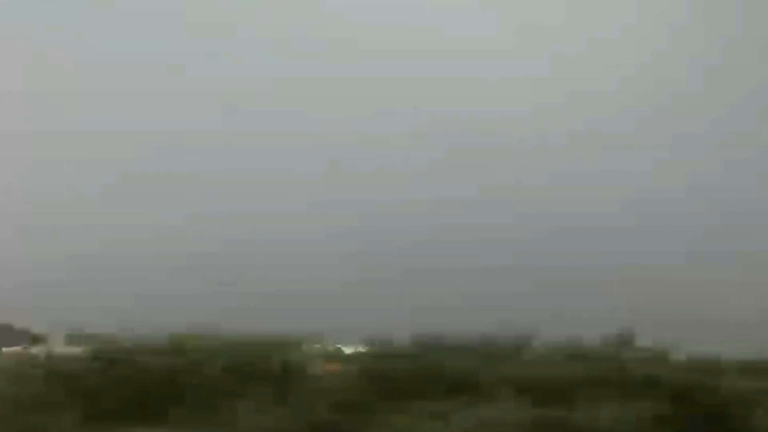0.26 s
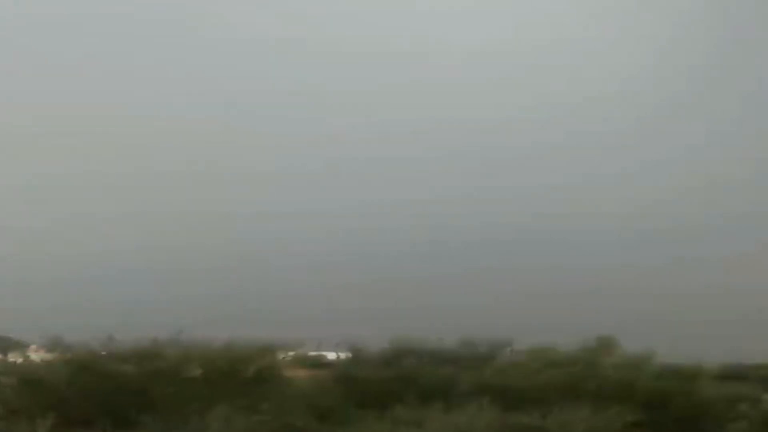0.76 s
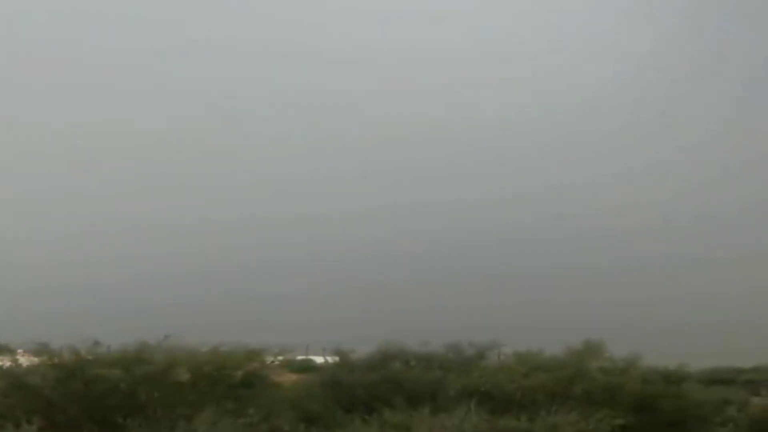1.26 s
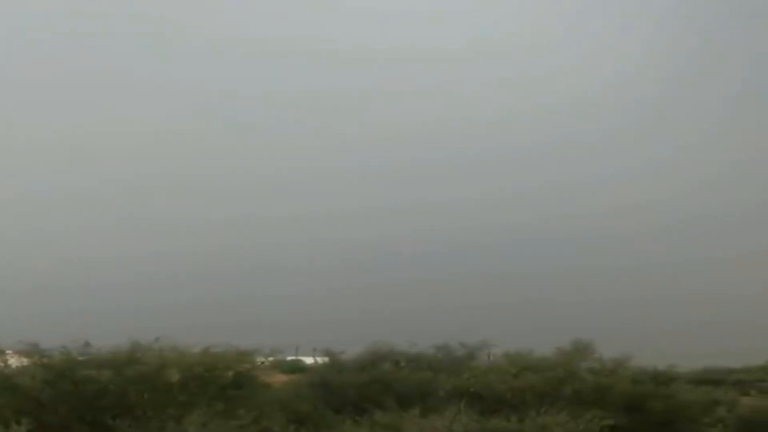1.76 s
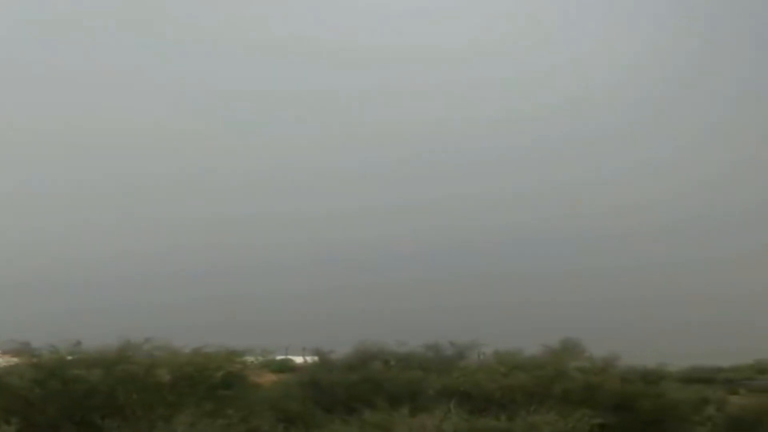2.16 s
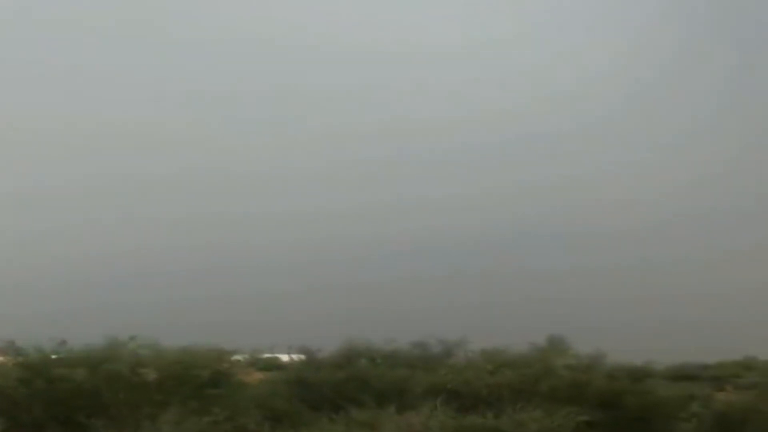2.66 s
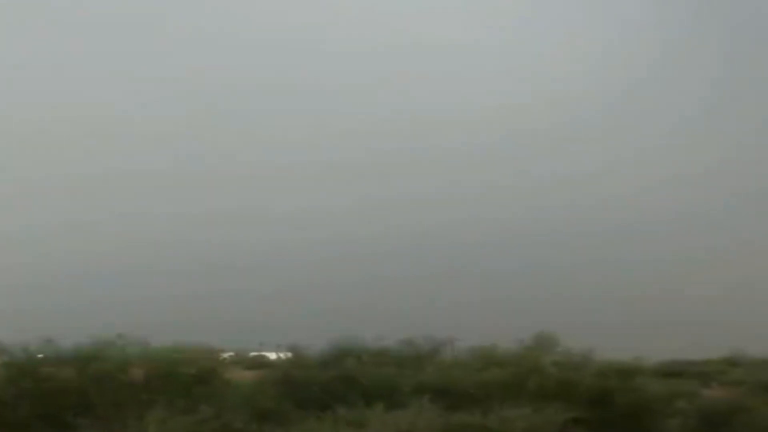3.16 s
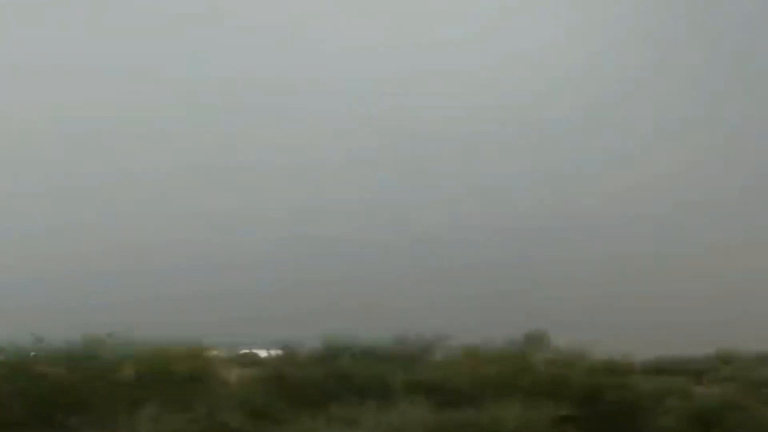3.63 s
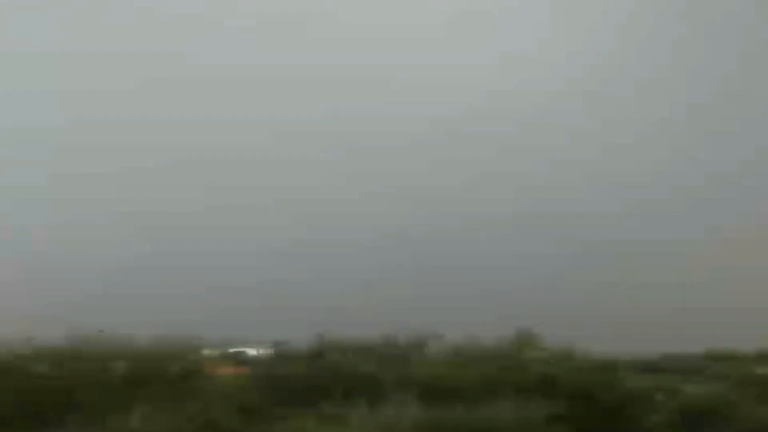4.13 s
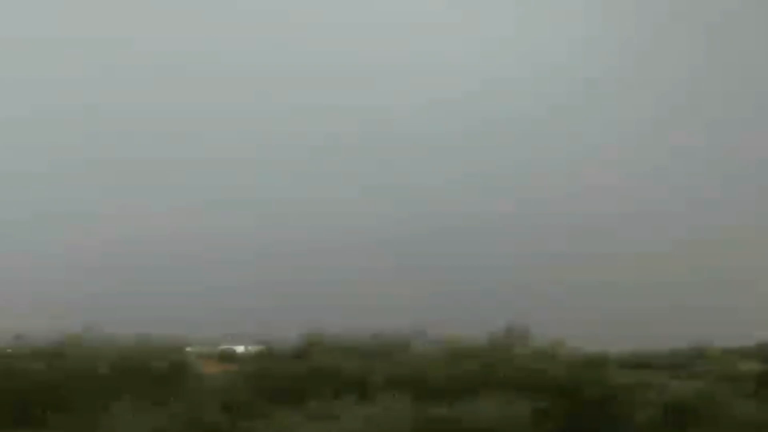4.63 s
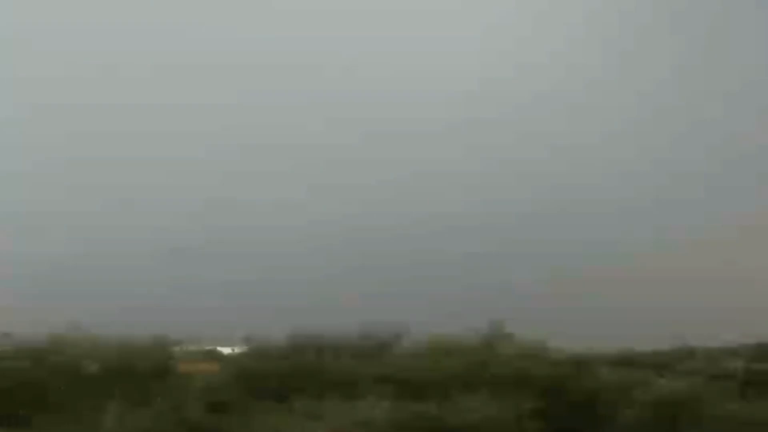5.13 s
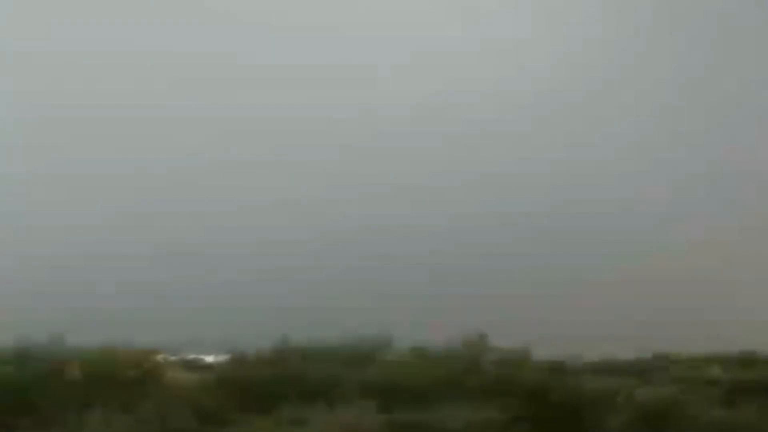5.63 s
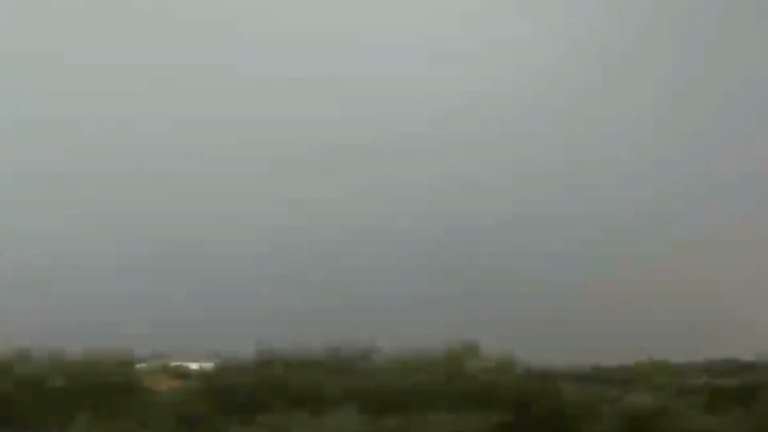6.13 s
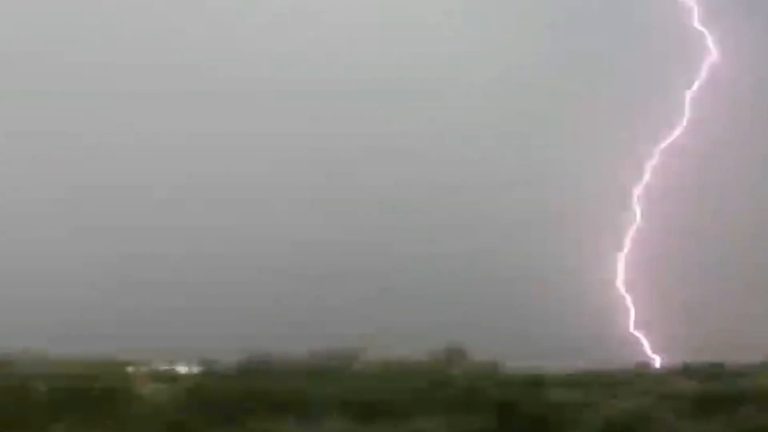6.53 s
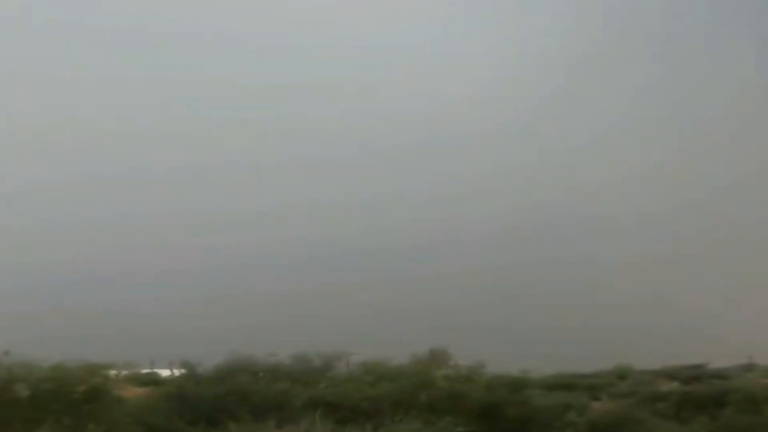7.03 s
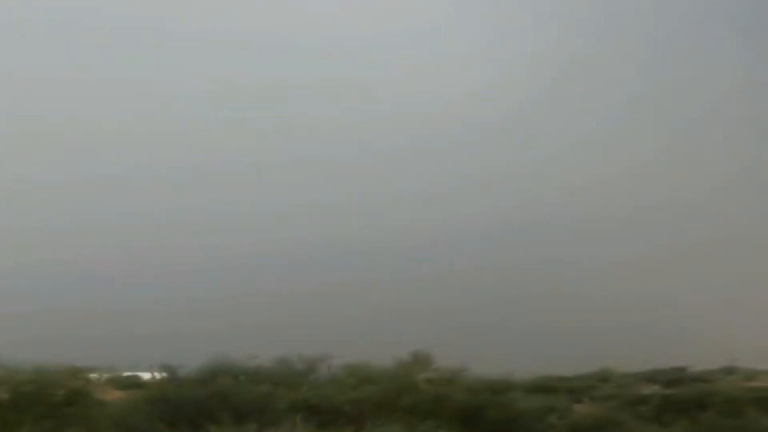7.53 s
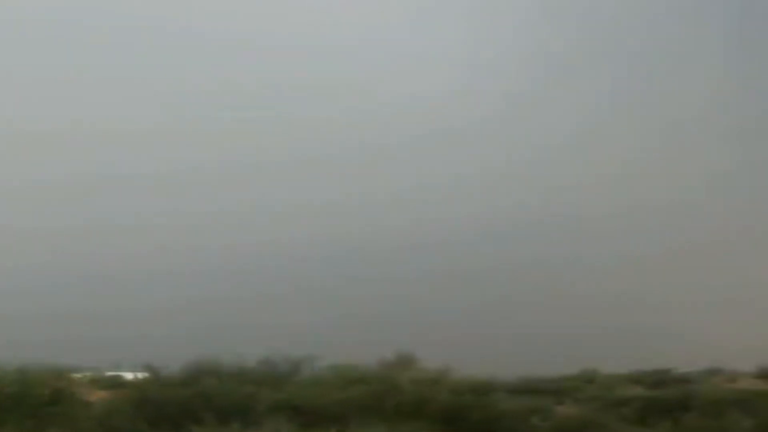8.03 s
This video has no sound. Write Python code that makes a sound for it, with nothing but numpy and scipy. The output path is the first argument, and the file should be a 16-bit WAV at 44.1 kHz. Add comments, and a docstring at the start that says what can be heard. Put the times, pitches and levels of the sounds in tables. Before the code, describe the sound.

Light rain falls outdoors, a faint steady hiss with sharp drips and spatters landing near a small microphone. Much louder, thunder is already rumbling across the open land. It comes in uneven waves of dull booms, peaks in one heavy peal, keeps growling and swells again before it starts to die down, while the drops go on ticking.

```python
"""Thunder rolls in long swells over open country while rain falls, heard by one small microphone.
The roll is a dense stream of shock waves from a long lightning channel: peals ride on a rumble,
and single booms stand out. Far rain merges into a hiss; near drops tick, splash and spatter,
and a few trap bubbles that plink. Midway a faint buzz passes in the distance, with one thin squeak."""
import sys
import numpy as np
from scipy import signal
from scipy.fft import rfft, irfft
from scipy.io import wavfile
from scipy.ndimage import uniform_filter1d

SR = 44100
rng = np.random.default_rng(int(sys.argv[2]) if len(sys.argv) > 2 else 0)


def unload_audio(sound):
    """Save the sound as a 16-bit wav file, at the path given as the first command line argument."""
    columns = np.transpose(np.atleast_2d(sound))
    # keep every value between -1 and 1, then stretch to whole-number steps
    steps = np.round(np.clip(columns, -1, 1) * 32767)
    wavfile.write(sys.argv[1], SR, steps.astype(np.int16))


N = 365588
T = np.arange(N) / SR
HZ = np.fft.rfftfreq(N, 1 / SR)


def gain_of(db):
    """Decibels to amplitude."""
    return 10 ** (np.asarray(db) / 20)


def unit_rms(x):
    """Scales to rms 1."""
    return x / np.sqrt(np.mean(x ** 2) + 1e-20)


def eq_curve(points, hz):
    """Joins EQ points by straight lines on a log-frequency axis."""
    f, db = np.transpose(points)
    return np.interp(np.log(hz + 1), np.log(f + 1), db)


def high_cut(edge_hz):
    """Gain of a steep low-pass over the spectrum."""
    return 1 / (1 + (HZ / edge_hz) ** 12)


def automation(rows):
    """Turns timed breakpoints into one curve per column."""
    times, *columns = np.transpose(rows)
    return [np.interp(T, times, column) for column in columns]


def wobble(shape, samples):
    """Smoothed noise of rms 1, for modulation."""
    return unit_rms(uniform_filter1d(rng.standard_normal(shape), size=samples, axis=0))


def add(mix, s, sound):
    """Mixes a sound in at s seconds."""
    part = mix[max(round(s * SR), 0):][:len(sound)]
    part += sound[:len(part)]


def clicks(per_s, spread_db):
    """Impulses at random times: many small, a few large."""
    size = gain_of(spread_db * np.minimum(rng.exponential(1, N), 4))
    return size * rng.choice([-1., 1.], N) * (rng.random(N) < per_s / SR)


def tick(centre_hz, octaves, size=512):
    """A sharp transient of energy 1 whose spectrum is one broad hump."""
    hz = np.fft.rfftfreq(size, 1 / SR) + 1
    log_gain = np.maximum(-3 * np.log(1 + (np.log2(hz / centre_hz) / octaves) ** 2 / 2), -9)
    mirrored = np.concatenate([log_gain, log_gain[-2:0:-1]])
    pulse = np.fft.ifft(np.exp(signal.hilbert(mirrored).conj())).real  # minimum phase: no pre-ring
    return pulse / np.linalg.norm(pulse)


def resonate(x, hz, width_hz):
    """A resonance of gain 1 that follows the curve hz."""
    carrier = np.exp(2j * np.pi * np.cumsum(hz) / SR)
    pole = np.exp(-np.pi * width_hz / SR)
    return 2 * (carrier * signal.lfilter([1 - pole], [1, -pole], x / carrier)).real


# Tone of thunder after its way through the air: f/Hz, relative level/dB
THUNDER_EQ = [(13, -52), (25, -26), (45, -6.5), (60, 2.5), (75, 4.5), (120, 1.5), (175, 0.5), (265, -5.5),
              (350, -9), (450, -14), (600, -22), (780, -28), (1100, -39.5), (1600, -53), (2600, -87.5)]

def shock_stream(per_s=2300, spread_db=1.5):
    """Shocks from all along the lightning channel overlap, dulled by the air."""
    return irfft(rfft(clicks(per_s, spread_db)) * gain_of(eq_curve(THUNDER_EQ, HZ)), N)


# Clearness of the air path: t/s, treble shelf gain/dB
AIR_SHELF = [(0, 6.5), (1.5, 7.5), (2.9, 4), (3.4, -3), (4.5, 3), (6.2, 1.5), (8.29, 1)]

def air_path(shocks, shelf_hz=666):
    """Clearer air lets more of the thunder's top through."""
    treble = irfft(rfft(shocks) * (1 - high_cut(shelf_hz)), N)
    return shocks + (gain_of(automation(AIR_SHELF)[0]) - 1) * treble


# A near bounce that shifts with the thunder's direction: t/s, delay/s, gain/factor
NEAR_BOUNCE = [(0, 0.0069, 0.37), (2.85, 0.0066, 0.27), (3.3, 0.00496, 0.17), (4.2, .0036, 0.066),
               (5.2, 0.0035, 0.15), (6.3, 0.00402, 0.28), (8.29, 0.00492, 0.19)]

def near_reflection(shocks):
    """The bounce cuts a moving comb into the sound."""
    delay_s, gain = automation(NEAR_BOUNCE)
    return shocks + gain * np.interp(T - delay_s, T, shocks)


# The bed under the peals: t/s, body level/dB, tearing top level/dB
RUMBLE_BED = [(0, -29, -37), (.7, -31, -41), (1.45, -34.5, -46.5), (2.05, -33.5, -45), (2.9, -32, -41.5),
              (3.6, -29.5, -39), (4.8, -27.5, -45), (5.6, -29.5, -43.5), (6.5, -30, -44.5),
              (7.7, -35, -52.5), (8.29, -36.5, -52)]

def rumble_power(deep_db=-9.5, growl_db=-3):
    """Power of the unbroken rumble in four bands: deep bass, body, growl, tearing top."""
    body, tear = automation(RUMBLE_BED)
    return gain_of([body + deep_db, body, body + growl_db, tear]) ** 2


# One peal for each stretch of the channel:
# t/s, length/s, body level/dB, deep bass re body/dB, growl re body/dB, core f/Hz
PEAL_CUES = [(0.017, 0.045, -27, -2, -1.5, 149), (0.212, .07, -33, -7, 2.5, 173),
             (0.42, 0.2, -28, -3.5, -3, 172), (0.884, .13, -34.5, -4, -7, 164),
             (2.131, 0.14, -23, -2.5, -5.5, 163), (2.325, 0.14, -27.5, -4, -6, 135),
             (2.804, 0.12, -31.5, -13, 0, 296), (3.068, 0.34, -23.5, -8, -4.5, 179),
             (3.4, 0.19, -17.5, -6, -7, 113), (3.621, 0.25, -26.5, -7.5, -3, 186),
             (3.936, 0.31, -24.5, -5, -5.5, 149), (4.263, 0.11, -28, 5, 2.5, 99),
             (4.377, 0.21, -23.5, -5, 1, 275), (4.932, 0.26, -31, -1, 6, 279),
             (5.687, 0.25, -30.5, -2, 3.5, 260), (6.028, 0.11, -27, 1, 1.5, 176),
             (6.121, 0.2, -22.5, -14.5, -0.5, 250), (6.507, .22, -30.5, -3.5, -2.5, 236),
             (6.884, 0.24, -31.5, -11, -8, 171), (7.133, 0.16, -36, -1.5, 3, 241)]
PEAL_ATTACK_S = 0.065

def peal_power(release_s=0.08, tear_db=-16.5):
    """Power of the peals in the same four bands: each swells, holds and dies away."""
    power = np.zeros((4, N))
    for s, length, db, deep, growl, _ in PEAL_CUES:
        attack = np.clip((T - s) / PEAL_ATTACK_S, 0, 1)
        release = np.exp(-np.maximum(T - s - length, 0) / release_s)
        bands = gain_of([db + deep, db, db + growl, db + growl + tear_db])
        power += np.outer(bands, attack * release) ** 2
    return power


def peal_core(shocks, boost=0.64, width_hz=50):
    """Each peal gathers its weight around one pitch, which glides on to that of the next."""
    pitches = [(s + PEAL_ATTACK_S + part * length, hz)
               for s, length, *_, hz in PEAL_CUES for part in (0, .5)]
    return shocks + boost * resonate(shocks, automation(pitches)[0], width_hz)


# Crossovers between deep bass, body, growl and tearing top: f/Hz
CROSSOVERS = [100, 220, 480]

def thunder_roll(steady_s=0.083):
    """The shock stream, levelled band by band, rides the swells of rumble and peals."""
    shocks = peal_core(shock_stream())
    spectrum = rfft(near_reflection(air_path(shocks)))
    cuts = [0] + [high_cut(hz) for hz in CROSSOVERS] + [1]
    levels = np.sqrt(rumble_power() + peal_power())
    window = signal.windows.hann(int(2 * steady_s * SR))
    weight = signal.fftconvolve(np.ones(N), window, "same")
    out = np.zeros(N)
    for low, high, level in zip(cuts, cuts[1:], levels):
        band = irfft(spectrum * (high - low), N)
        power = signal.fftconvolve(band ** 2, window, "same") / weight
        out += band / np.sqrt(abs(power) + 1e-20) * level
    return out


def dull_echo(thunder, delay_s=0.01135, gain=0.2, edge_hz=352):
    """A farther surface returns the low end of the thunder, which ripples the bass."""
    echo = gain * np.exp(-2j * np.pi * HZ * delay_s) / (1 + (HZ / edge_hz) ** 2) ** 2
    return irfft(rfft(thunder) * (1 + echo), N)


# Tone of far rain: f/Hz, relative level/dB
HISS_EQ = [(20, -14.5), (300, -1), (1000, 8.5), (1500, 7), (2000, 1.5), (3000, -1), (3800, -5.5),
           (5000, -7.5), (7000, -10), (10000, -15), (14000, -12), (16000, -19)]

def far_rain(patchy_db=1.95, flicker_db=0.5):
    """Countless far drops merge into a hiss with small drifting patches."""
    frames, hz = N // 128 + 5, np.fft.rfftfreq(512, 1 / SR)
    real, imag, patches = rng.standard_normal((3, frames, len(hz)))
    patches = uniform_filter1d(patches, size=10, axis=0)  # smooth in time
    patches = unit_rms(uniform_filter1d(patches, size=7, axis=1))  # and in frequency
    db = eq_curve(HISS_EQ, hz) + patchy_db * patches + flicker_db * wobble((frames, 1), 6)
    spectra = (real + 1j * imag) * gain_of(db)
    return unit_rms(signal.istft(spectra.T, nperseg=512, noverlap=384)[1][:N])


def patter(per_s=300, spread_db=4.0, low_hz=2200, high_hz=14000, spray=0.84, spray_s=0.0025, count=24):
    """Small drops land a little way off, each surface with its own colour."""
    out, t = np.zeros(N), np.arange(SR // 40) / SR
    for hz in np.geomspace(low_hz, high_hz, count):
        splash = rng.standard_normal(len(t)) * np.exp(-t / spray_s)
        splash *= spray / np.linalg.norm(splash)
        splash[0] += 1  # the impact
        drop = np.convolve(splash, tick(hz, octaves=rng.uniform(0.91, 1.8)))
        out += signal.oaconvolve(clicks(per_s / count, spread_db), drop)[:N]
    return unit_rms(out)


# How hard it rains: t/s, patter level/dB
RAIN_FADER = [(0, -70), (1.3, -70.3), (4.5, -69.5), (6.9, -70), (8.29, -69)]

def rain_bed(hiss_over_patter_db=9.5):
    """Hiss and patter follow the strength of the shower together."""
    return gain_of(automation(RAIN_FADER)[0]) * (gain_of(hiss_over_patter_db) * far_rain() + patter())


# Foreground drops: t/s, energy before trim/dB, centre f/Hz, width/octaves, spray share of energy/0-1
DROP_CUES = [(0.059, -25.5, 1400, 2.5, 0), (0.0793, -30, 4100, 3.5, .1), (0.238, -23.5, 1000, 2.6, 1),
             (0.3678, -31, 3200, 1.8, 0.1), (0.5253, -29.5, 2410, 0.66, .7),
             (0.592, -31.5, 5070, 0.92, 0.06), (0.8232, -30, 1000, 2.4, 0.1), (0.853, -29, 2000, 2.2, 0.8),
             (1.381, -24, 1000, 1.7, 1), (1.6599, -32, 6700, 1.7, 0.3), (1.6806, -28.5, 6300, 1.5, 0.1),
             (1.9101, -26.5, 3000, 1, 0.6), (2.1153, -30, 5600, 1.6, 0), (2.4334, -23, 1000, 3.1, 0.7),
             (2.595, -24.5, 1300, 2.9, 0.6), (2.6328, -26, 1700, 2, 0.7), (2.806, -28, 4400, 1.2, .2),
             (2.9334, -30, 4100, 1.3, 0.04), (2.987, -25, 1500, 2.1, 0.7), (3.029, -28, 2100, 1.5, 0),
             (3.1315, -29.5, 1300, 3.1, 0.1), (3.4077, -16, 1500, 1.6, 0.9), (3.429, -19, 1010, 1.1, 0.7),
             (3.949, -31, 4100, .7, .7), (4.165, -31, 6700, 2.2, 0.1), (4.2336, -35, 14000, 2, 0),
             (4.7537, -33, 3400, 2.2, 0.2), (4.8054, -32, 4400, 1.5, 0.1), (4.9012, -23, 2900, 1.3, 0.1),
             (4.934, -31.5, 3000, 2.3, 0.2), (5.104, -31, 4630, 1.8, 0.5), (5.4161, -30.5, 2700, 1.5, 0.5),
             (5.4305, -33, 3900, 1, .1), (5.4583, -31.5, 3400, 1.5, .1), (5.5308, -30, 4000, 3.2, 0.1),
             (5.6364, -32.5, 4900, 1.6, .3), (5.6958, -23, 3220, 1.5, 0.07), (5.8208, -30, 8100, 2, 0.13),
             (5.8663, -28.5, 1000, 2.8, 0.4), (6.019, -26, 3700, 1.2, 0.12), (6.2336, -14, 990, 0.76, 0.8),
             (6.4401, -20, 2900, 1.3, 0.26), (6.9503, -29, 2700, 1.6, 0.94), (7.0054, -31, 4900, 3.5, .3),
             (7.108, -28, 1000, 2.6, 0), (7.1383, -31, 4600, 1.7, .1), (7.1598, -17, 950, 1.4, .23),
             (7.2238, -26, 1000, 2.2, 1), (7.24, -22, 8100, 2.6, 0.5), (7.339, -27, 2820, 1.1, 0.3),
             (7.4323, -29, 8100, 4, .05), (7.4905, -27, 1600, 2.7, .03), (7.5124, -27, 2000, 2.4, 0.14),
             (7.523, -30, 2400, 3.5, .1), (7.531, -32, 2100, 1.6, 0.1), (7.5934, -26, 1100, 2.5, 0.8),
             (7.848, -28.5, 3400, 1.9, 0), (7.986, -20.5, 1170, 1.1, 0.8), (8.022, -24.5, 3900, 1.4, .02),
             (8.0424, -21, 1300, 0.89, 0.6), (8.059, -28.5, 2200, 2.6, 0), (8.1176, -27, 1000, 1.8, .05),
             (8.1955, -32, 3900, 1.1, 0), (8.2575, -25.5, 1700, 1.7, 0)]

def near_drops(trim_db=-1, splash_s=0.0091, rise_s=.0015, rebound=0.24, rebound_s=.0002):
    """Each drop ticks as it lands, inside a short spray of droplets."""
    out, t = np.zeros(N), np.arange(SR // 20) / SR
    for s, db, hz, octaves, share in DROP_CUES:
        pulse = gain_of(db + trim_db) * tick(hz, octaves)
        lag = int(rebound_s * SR * (.5 + rng.random()))
        pulse = (pulse - rebound * np.roll(pulse, lag)) / np.hypot(1, rebound)  # the surface springs back
        spray = rng.standard_normal(len(t)) * np.exp(-t / splash_s) * (1 - np.exp(-t / rise_s))
        spray *= np.sqrt(share) / np.linalg.norm(spray)
        add(out, s, np.sqrt(1 - share) * pulse)
        add(out, s - 2 * rise_s, np.convolve(spray, pulse))
    return out


# Single hits in the thunder: t/s, level before trim/dB, f/Hz
BOOM_CUES = [(0.077, -23, 176), (0.112, -17, 184), (0.26, -15, 167), (0.546, -13.5, 170), (0.664, -11, 180),
             (0.945, -16, 148), (1.086, -15, 169), (1.299, -13.5, 152), (2.167, -8.5, 145),
             (2.242, -5.5, 135), (2.379, -3, 126), (2.763, -10, 140), (3.132, -12.5, 175),
             (3.301, -10.5, 112), (3.442, -8, 116), (3.507, -4, 110), (3.621, -6, 182), (3.892, -16, 162),
             (4.097, -10, 147.5), (4.486, -17, 177), (5.002, -14, 186), (5.047, -18, 225), (5.183, -9, 233),
             (5.22, -7.5, 255), (5.272, -12.5, 249), (5.834, -6, 197), (5.868, -8, 213), (6.167, -8, 165),
             (6.222, -10.5, 253), (6.309, -4, 198), (6.611, -11, 163), (6.707, -10.5, 169),
             (6.98, -14, 148), (7.29, -23, 164)]

def booms(cycles=0.9, trim_db=-3):
    """Strong shocks, each rounded by the air to a swing or two."""
    out, t = np.zeros(N), np.arange(-SR // 25, SR // 25) / SR
    for s, db, hz in BOOM_CUES:
        swing = np.exp(-(t * hz / cycles) ** 2) * np.cos(2 * np.pi * (hz * t + rng.random()))
        add(out, s + t[0], gain_of(db + trim_db) * swing)
    return out


# Drops that hit water: t/s, level before envelope/dB, f/Hz, decay/s
PLINK_CUES = [(1.6803, -45, 13100, .001), (1.9092, -40.5, 3500, 0.002), (3.407, -44, 1730, 0.015),
              (7.3377, -33.5, 4200, 0.0011), (7.984, -35.5, 2910, 0.0021), (8.0415, -45, 2200, .004)]

def plinks(rise_s=0.00066):
    """A trapped air bubble rings for an instant."""
    out, t = np.zeros(N), np.arange(SR // 20) / SR
    for s, db, hz, decay_s in PLINK_CUES:
        envelope = np.exp(-t / decay_s) * (1 - np.exp(-t / rise_s))
        add(out, s, gain_of(db) * envelope * np.sin(2 * np.pi * hz * t))
    return out


# Bursts of fine spatter: middle t/s, level/dB, half length/s
FLURRY_CUES = [(3.46, -62.5, .06), (3.722, -72.5, 0.13), (4.204, -60, 0.038), (4.64, -61, 0.04),
               (5.53, -66, .06), (7.2, -65.5, 0.058), (8.011, -53, 0.026)]

def flurries(per_s=320, spread_db=5.0, centre_hz=11000, octaves=3.1):
    """Tiny droplets strike close to the microphone."""
    droplets = unit_rms(signal.oaconvolve(clicks(per_s, spread_db), tick(centre_hz, octaves))[:N])
    return droplets * sum(gain_of(db) * np.exp(-((T - s) / half_s) ** 2) for s, db, half_s in FLURRY_CUES)


# The buzz's two swells: t/s, length/s, top fundamental f/Hz, level/dB
BUZZ_CUES = [(4.268, .72, 180, -66), (5.087, .18, 179, -69)]
# Its harmonics 9 to 14: level re the swell/dB
BUZZ_HARMONICS = [-10, -1.5, -6.5, -2.5, -3.5, -12]

def far_buzz(waver=0.35, jitter=.003, sag=0.043, fade_s=0.061):
    """A faint buzz whose pitch arches; only upper harmonics are heard, each wavering on its own."""
    out = np.zeros(N)
    for s, length, top_hz, db in BUZZ_CUES:
        t = np.arange(0, length, 1 / SR)
        arch = 1 - sag * (2 * (t / length) ** .8 - 1) ** 2
        unsteady = 1 + jitter * wobble(len(t), 900)
        turns = np.cumsum(top_hz * arch * unsteady) / SR
        level = gain_of(db) * np.minimum(np.minimum(t, length - t) / fade_s, 1)
        for k, harmonic_db in enumerate(BUZZ_HARMONICS, 9):
            fading = 1 + waver * wobble(len(t), 5000)
            tone = np.sin(2 * np.pi * (k * turns + rng.random()))
            add(out, s, level * gain_of(harmonic_db) * fading * tone)
    return out


# The squeak's two partials: f/Hz, level/dB
SQUEAK_PARTIALS = [(11790, -73), (15330, -76)]

def squeak(middle_s=4.62, half_s=0.064, width_hz=120):
    """Two narrow bands of noise swell briefly, very high."""
    noise = rng.standard_normal(N)
    partials = sum(gain_of(db) * unit_rms(resonate(noise, np.full(N, hz), width_hz))
                   for hz, db in SQUEAK_PARTIALS)
    return partials * np.exp(-((T - middle_s) / half_s) ** 2)


def scene():
    """Mono mix of thunder, rain, buzz and squeak in open air."""
    thunder = dull_echo(thunder_roll() + booms())
    rain = rain_bed() + flurries() + near_drops() + plinks()
    return (thunder + rain + far_buzz() + squeak())[None]


def record(dry, bass_cut_hz=42, top_hz=15900, fade_in_s=.004):
    """The small microphone loses the lowest bass; a steep filter takes off the very top."""
    faded = dry * np.minimum(T / fade_in_s, 1)
    thinned = signal.sosfilt(signal.butter(2, bass_cut_hz, "highpass", fs=SR, output="sos"), faded)
    band_limit = signal.firwin(511, top_hz, window=("kaiser", 9), fs=SR)
    return signal.oaconvolve(thinned, band_limit[None], "same")


dry = scene()
out = record(dry)
unload_audio(out)
```